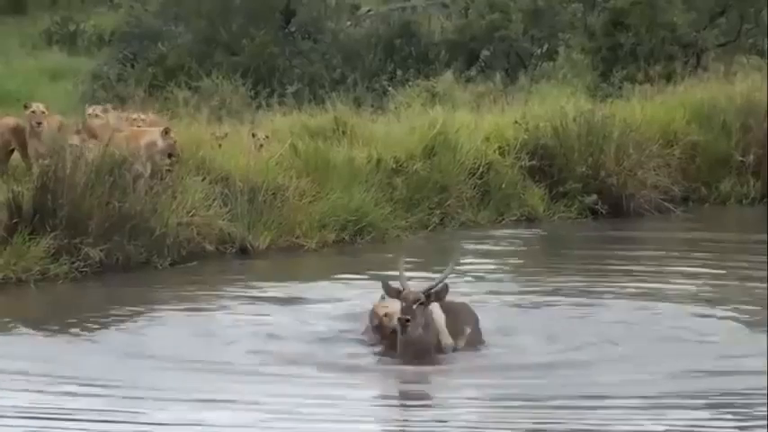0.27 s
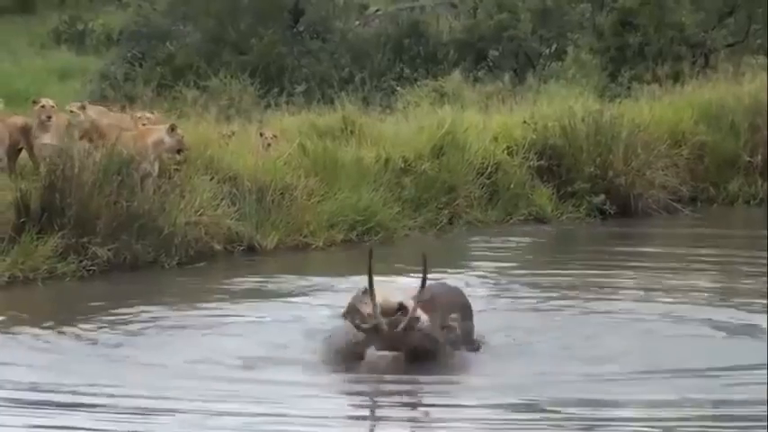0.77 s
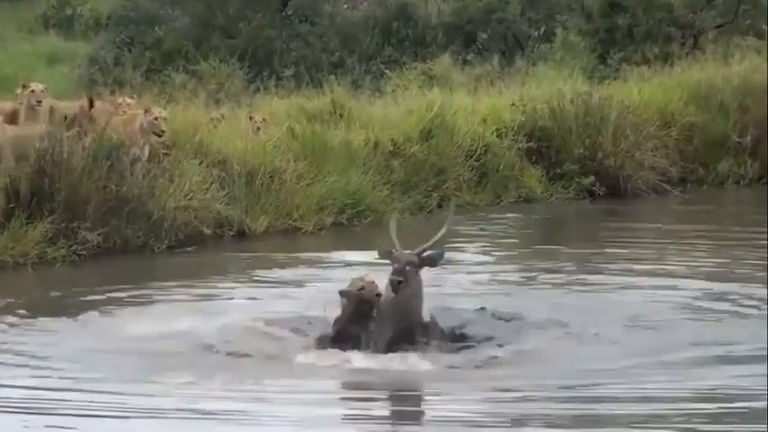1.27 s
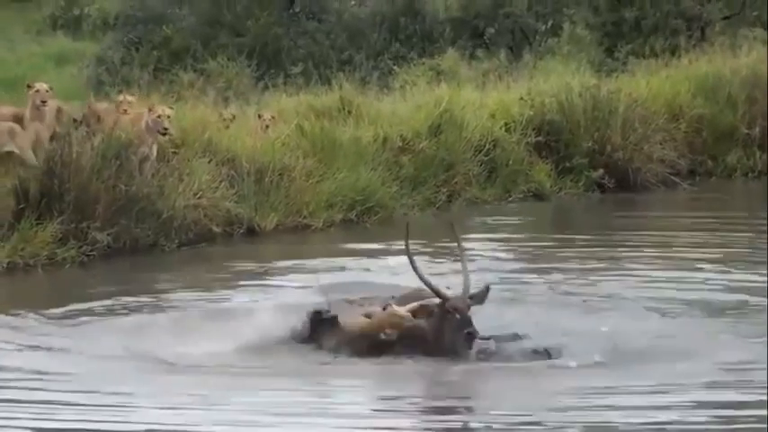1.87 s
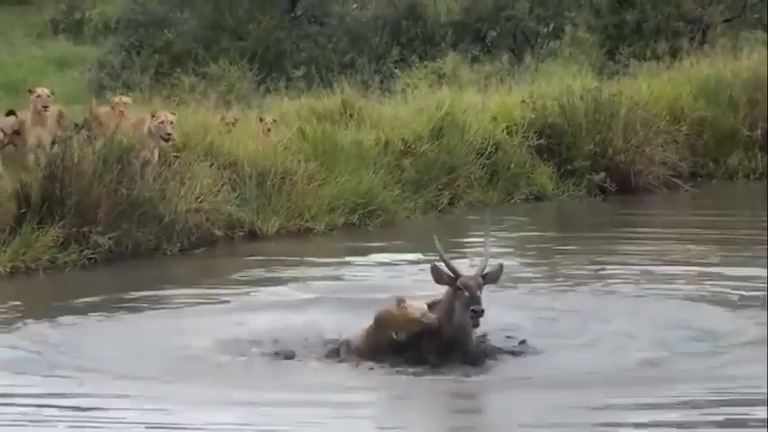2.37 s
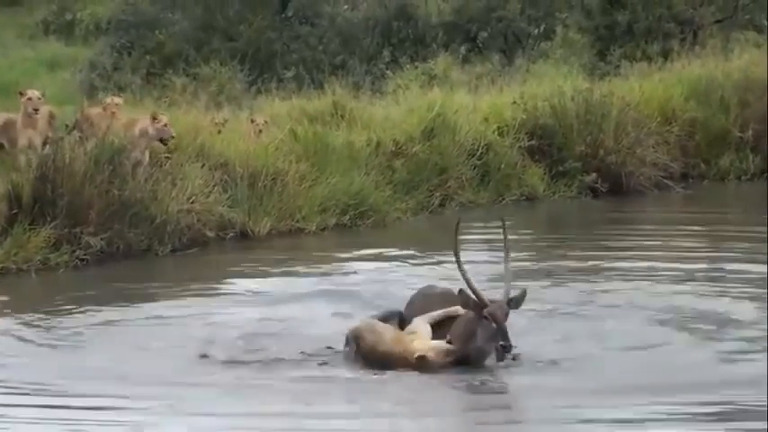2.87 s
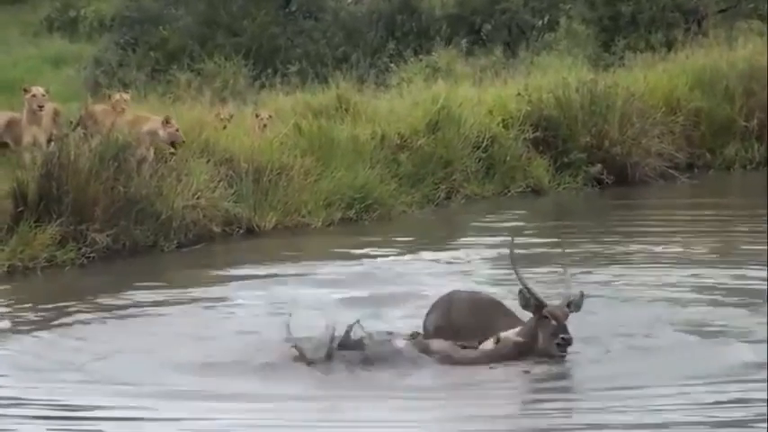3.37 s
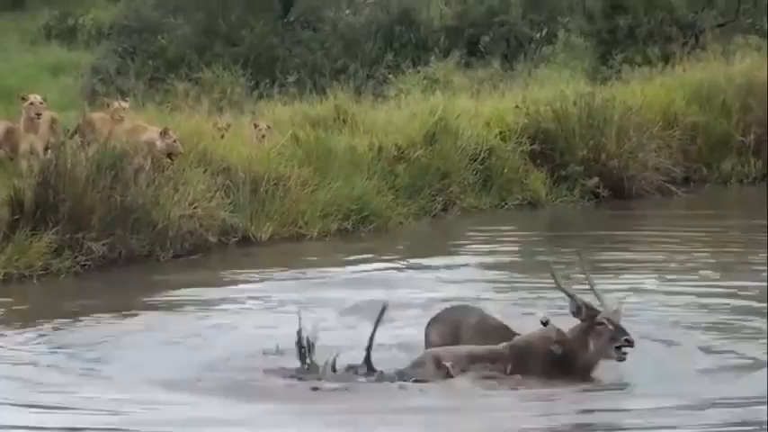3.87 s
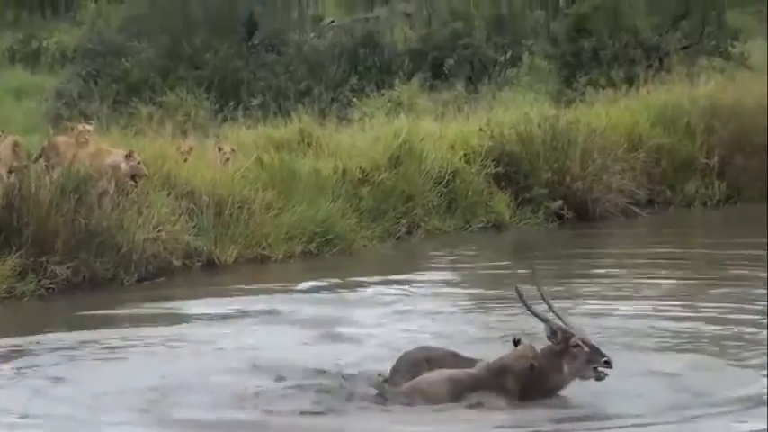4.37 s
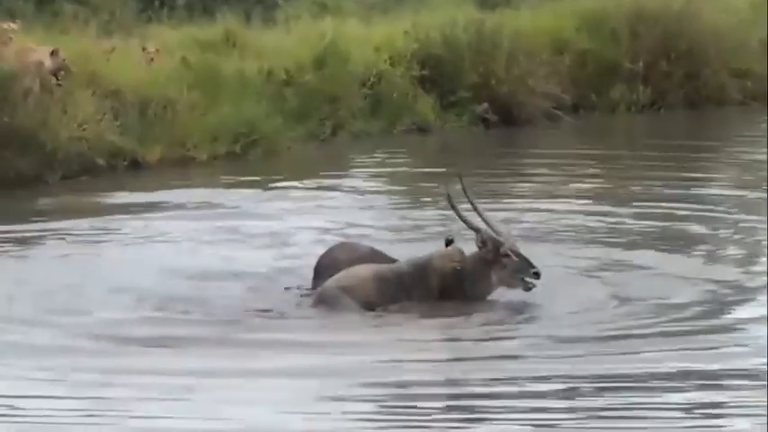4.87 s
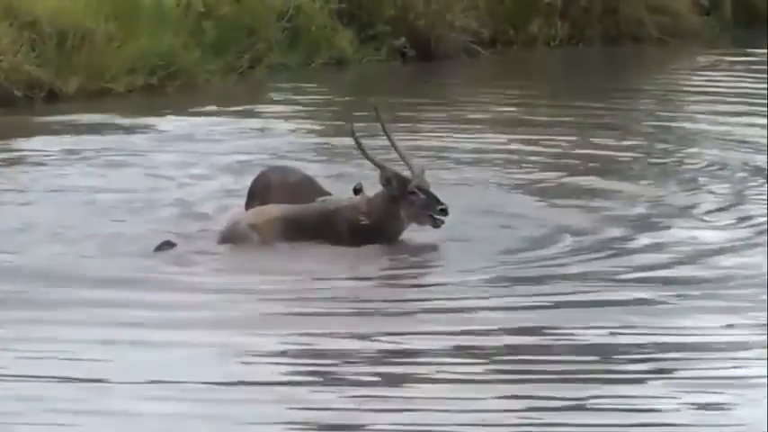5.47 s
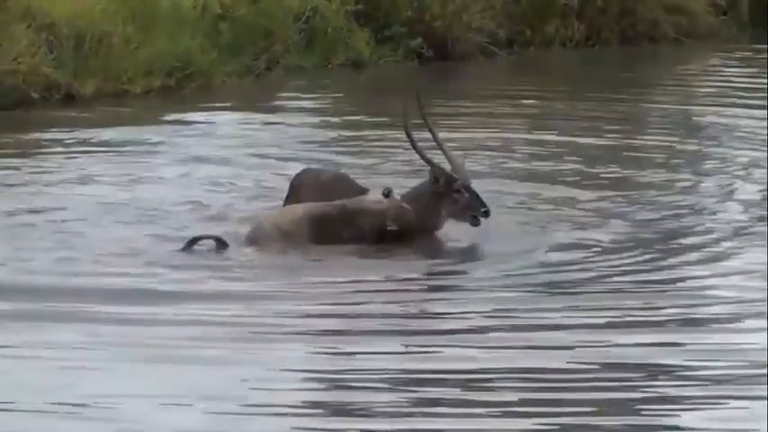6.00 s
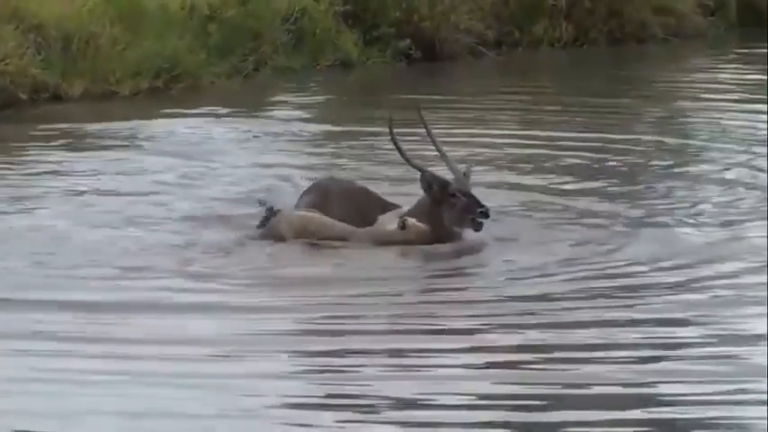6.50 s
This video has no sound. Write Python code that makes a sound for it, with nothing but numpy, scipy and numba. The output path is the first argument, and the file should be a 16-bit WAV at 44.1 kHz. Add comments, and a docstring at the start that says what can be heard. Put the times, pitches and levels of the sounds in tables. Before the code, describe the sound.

Water slaps and wind pops lead into two long rasping growl-roars from a struggle in a river, over faint insects and chirping birds.

```python
"""Insects, still air and a low rumble of wind and chest last throughout, with churning water faint at first.
Bird chips and a short hoarse grunt open; slaps, wind pops and falling bird slides follow up to two seconds.
An animal struggling in a pool then gives two long roars: irregular puffs of air through a long throat.
Churning, drips and chips carry on after them. Water is filtered noise with bubble rings, birds are gliding
sines, the rumble is low noise, and the banks answer the struggle with a short, faint, diffuse echo."""
import sys
import numpy as np
from scipy import signal
from scipy.fft import rfft, irfft, next_fast_len
from scipy.io import wavfile
from scipy.ndimage import uniform_filter1d, map_coordinates
from numba import njit

SR = 44100
rng = np.random.default_rng(int(sys.argv[2]) if len(sys.argv) > 2 else 0)


def wrap_up_sound(samples):
    """Save the sound to the file named by the first command line argument, as 16-bit audio."""
    columns = np.atleast_2d(samples).T
    # keep every value between -1 and 1, then stretch to whole-number steps
    tamed = np.clip(columns, -1, 1)
    steps = np.round(tamed * 32767).astype(np.int16)
    wavfile.write(sys.argv[1], SR, steps)


N = 297234


def amp(db):
    """Decibel law: the amplitude gain of a level in dB."""
    return 10 ** (np.asarray(db) / 20)


def unit(x):
    """Power normalisation: x at rms 1."""
    return x / np.sqrt(np.mean(x ** 2) + 1e-20)


def curves(rows):
    """Linear interpolation: one value per sample for each column after the time."""
    time_s, *columns = np.transpose(rows)
    return [np.interp(np.arange(N) / SR, time_s, column) for column in columns]


def wobble(rate):
    """Random modulation: a smooth curve through normal draws, rate knots a second."""
    knots = rng.standard_normal(int(N * rate / SR) + 4)
    return map_coordinates(knots, [np.arange(N) * rate / SR])


def swell(s, half):
    """Raised-cosine envelope: a bump of height 1 at s, down to half height at s - half and s + half."""
    return np.cos(np.pi / 2 * np.clip((np.arange(N) / SR - s) / half / 2, -1, 1)) ** 2


def filtered(x, response):
    """Linear filtering: the spectrum of x times a complex response of frequency."""
    m = next_fast_len(N + SR // 2)
    return irfft(rfft(x, m) * response(np.fft.rfftfreq(m, 1 / SR)), m)[..., :N]


def coloured(x, points):
    """Spectral shaping: x through (Hz, dB) points joined on a log frequency axis, at rms 1."""
    f, db = np.transpose(points)
    return unit(filtered(x, lambda hz: amp(np.interp(np.log(hz + 1), np.log(f + 1), db))))


def through(x, modes):
    """Modal superposition: fixed (Hz, width Hz, dB) resonances of alternating sign, at rms 1."""
    def response(f):
        total = 0
        for k, (centre, width, db) in enumerate(modes):
            damping = 1j * f * width
            total = total + (-1) ** k * amp(db) * damping / (centre * centre - f * f + damping)
        return total
    return unit(filtered(x, response))


@njit
def spin(x, step):
    """Damped oscillation: a decaying phasor driven by x; step is its turn and decay per sample."""
    out, y = np.zeros(len(x)), 0j
    for i in range(len(x)):
        y = y * step[i] + x[i]
        out[i] = y.imag
    return out


def moving(x, hz, width_hz):
    """Time-varying resonance: x through a resonator whose frequency follows a curve, at rms 1."""
    return unit(spin(x, np.exp((2j * hz - width_hz) * np.pi / SR)))


def patchy(channels, patchy_db):
    """Random modulation: noise with patches of gain in time and frequency, alike in all channels."""
    z = signal.stft(rng.standard_normal((channels, N)), nperseg=512)[2]
    field = uniform_filter1d(rng.standard_normal(z.shape[1:]), 6, axis=0)
    field = uniform_filter1d(field, 8, axis=1)
    return signal.istft(z * amp(patchy_db * unit(field)), nperseg=512)[1][:, :N]


def spread(pair, side_db):
    """Partial coherence: left and right from a middle and an unrelated side."""
    side = amp(side_db) * pair[1]
    return np.array([pair[0] + side, pair[0] - side])


# spectrum of the still air: frequency_hz, relative_density_db (per Hz)
AIR_SPECTRUM = [(180, -40), (300, 0.5), (1330, -3), (3400, -11.5), (4080, -8), (5310, -10.5),
                (13200, -19.5), (14600, -28), (15600, -65)]
AIR_DB, INSECT_DB = -53.5, -57.5  # middle level; the insects pulse about theirs


def meadow():
    """Narrow-band noise under random modulation: a pulsing insect band over the still air."""
    band = through(rng.standard_normal((2, N)), [(4140, 510, 0)])
    band = through(band, [(4070, 530, 0)])
    pulsing = amp(INSECT_DB + 2.2 * wobble(30) + 0.7 * wobble(10))
    insects = pulsing * spread(band, side_db=-0.5)
    air = coloured(patchy(channels=2, patchy_db=3.0), AIR_SPECTRUM)
    return insects + amp(AIR_DB) * spread(air, side_db=-2.5)


# level of the low rumble, wind and the chest of the roars together: time_s, rumble_db
RUMBLE_LEVEL = [(0.0, -48), (0.05, -54), (0.09, -32.5), (0.36, -28.5), (0.39, -20.5), (0.45, -47.5),
                (0.66, -60), (0.67, -40.5), (1.37, -34), (1.67, -46), (1.8, -21.5), (1.84, -34.5),
                (2.19, -27), (3.34, -43.5), (3.47, -30.5), (4.41, -25), (4.43, -34.5), (5.56, -28),
                (5.61, -36), (6.49, -44), (6.65, -25), (6.74, -42)]
# spectrum of the rumble: frequency_hz, relative_density_db (per Hz)
RUMBLE_SPECTRUM = [(12, -40), (20, -4.5), (60, 0.5), (150, -11.5), (275, -25.5), (348, -26), (400, -50),
                   (520, -51), (880, -120)]


def rumble():
    """Partly coherent low noise: wind and chest as one lumpy rumble, stronger on the right."""
    lumps = amp(1.5 * wobble(16) + 1.5 * np.array([wobble(12), wobble(12)]))
    pair = spread(coloured(rng.standard_normal((2, N)), RUMBLE_SPECTRUM), side_db=-1.5)
    return amp(curves(RUMBLE_LEVEL)[0]) * unit(lumps * pair) * amp([[-1.8], [1.8]])


def grains(count, hz, spread, cycles, scatter_db):
    """Bubble resonance: damped rings at random moments, pitch rising as they close, at rms 1."""
    draw, t = rng.random((count, 2)), np.arange(400) / SR
    pitch = hz * np.exp(spread * rng.standard_normal((count, 1)))
    size = amp(-scatter_db * np.log(draw[:, 1:]))
    turns = pitch * t * (1 + .1 * pitch * t / cycles)
    ring = size * np.sin(2 * np.pi * turns) * np.exp(-pitch * t / cycles)
    at = (draw[:, :1] * N).astype(int) + np.arange(len(t))
    return unit(np.bincount(at.ravel(), ring.ravel())[:N])


# effort of the struggle: time_s, slosh_db
CHURN_LEVEL = [(0.07, -65), (0.42, -42), (0.76, -46.5), (0.8, -39), (0.846, -43.5), (0.866, -33.5),
               (1.03, -30.5), (1.23, -34), (1.83, -31), (1.93, -37.5), (2.95, -34), (3.03, -37.5),
               (3.24, -40), (3.4, -49), (4.8, -32), (4.87, -32.5), (4.936, -42.5), (5.1, -39.5), (5.7, -45),
               (5.85, -53), (6.35, -58.5), (6.4, -45.5), (6.55, -48), (6.67, -56.5)]
# spectrum of the slosh: frequency_hz, relative_density_db (per Hz)
SLOSH_SPECTRUM = [(88, -16), (150, -3), (251, -10), (561, 2.5), (689, -7), (818, -4.5), (1460, -9.5),
                  (2530, -11), (9000, -34.5), (11700, -34), (19800, -120)]
# spectrum of the spray: frequency_hz, relative_density_db (per Hz)
SPRAY_SPECTRUM = [(1760, -3.5), (3000, -5), (5890, -12), (6490, -7.5), (8430, -13.5), (11800, -17.5),
                  (15600, -26)]
# thrown water raining back: centre_s, half_length_s (to half height), peak_db (before the flicker)
RAINING_SHEETS = [(0.437, 0.026, -52), (0.926, 0.031, -44), (1.058, .03, -44), (1.475, 0.14, -39.5),
                  (1.83, 0.038, -38), (3.22, 0.12, -52), (4.844, 0.037, -55), (5.12, 0.29, -53.5)]
SPRAY_DB, SPRAY_GROWS = -51.5, 0.56  # level at mean slosh dB; dB gained per dB of slosh


def water():
    """Turbulence and bubble resonance: patchy slosh with bubbles, and spray with crackle."""
    slosh_db, = curves(CHURN_LEVEL)
    falling = amp(SPRAY_DB + SPRAY_GROWS * (slosh_db - slosh_db.mean()))
    falling = falling + sum(amp(db) * swell(s, half) for s, half, db in RAINING_SHEETS)
    lumps = wobble(18)
    slosh = coloured(patchy(channels=1, patchy_db=2.5)[0], SLOSH_SPECTRUM)
    bubbles = grains(count=3000, hz=1100, spread=.6, cycles=4, scatter_db=1.8)
    spray = coloured(patchy(channels=1, patchy_db=2.0)[0], SPRAY_SPECTRUM)
    crackle = grains(count=5000, hz=5760, spread=0.345, cycles=1.8, scatter_db=1.5)
    churning = amp(slosh_db + 0.5 * lumps) * unit(slosh + .8 * bubbles)
    return churning + falling * amp(1.3 * wobble(25)) * unit(spray + 0.45 * crackle)


def whistle(s, length, from_hz, to_hz, db, bend):
    """Frequency modulation: one falling sine under a smooth swell; bend warps its course in time."""
    u = np.clip((np.arange(N) / SR - s) / length, 0, 1) ** bend
    cycles = np.cumsum(from_hz + (to_hz - from_hz) * u) / SR
    return amp(db) * np.sin(np.pi * u) * np.sin(2 * np.pi * cycles)


# three-chip phrases, levels before panning: last_chip_s, last_peak_db, last_middle_hz
CHIP_PHRASES = [(0.0345, -40.5, 3890), (0.0792, -47, 4530), (0.299, -41.5, 4080), (3.4341, -41, 4110),
                (5.407, -40.5, 4040), (6.2447, -39.5, 3980)]
# falling whistles, levels before panning: start_s, length_s, peak_db
FALLING_SLIDES = [(0.078, 0.083, -48), (.545, 0.087, -46.5), (1.245, 0.11, -41), (1.602, .12, -44)]
SLIDE_FROM_HZ, SLIDE_TO_HZ = 5700, 4000
CHIP_GAP_S, CHIP_CLIMB_HZ, CHIP_SWELL_DB = .0225, 70, 2.5  # each phrase climbs and swells


def birds():
    """Tonal glides panned by level: quick falling chips to the left, long slides to the right."""
    chips = slides = 0
    for s, db, hz in CHIP_PHRASES:
        for k in range(3):  # counted back from the last chip
            middle_hz = hz - k * CHIP_CLIMB_HZ
            chips = chips + whistle(s - k * CHIP_GAP_S - .003, 0.0186, middle_hz * 1.07, middle_hz * .93,
                                    db - k * k * CHIP_SWELL_DB, bend=0.89)
    for s, length, db in FALLING_SLIDES:
        slides = slides + whistle(s, length, SLIDE_FROM_HZ, SLIDE_TO_HZ, db, bend=1.8)
    return slides * amp([[-1.5], [1.5]]) + chips * amp([[1.5], [-1.5]])


def banks(x):
    """Diffuse reflection: x convolved with a short decaying noise tail, different on each side."""
    t = np.arange(SR // 4) / SR
    tail = rng.standard_normal((2, len(t))) * amp(-60 * t / 0.024)  # falls 60 dB in 24 ms
    delayed = np.pad(x, (200, 0))  # samples
    return signal.fftconvolve(delayed[None], tail / np.linalg.norm(tail[0]), axes=1)[:, :N]


def bursts(tables):
    """Gated envelopes: curves of several calls, down to -100 dB in between."""
    rows = []
    for call in tables:
        first, last = call[0], call[-1]
        rows += [[first[0] - .004, -100, *first[2:]], *call, [last[0] + .03, -100, *last[2:]]]
    return curves(rows)


# one list per call: time_s, effort_db, mouth_opening_db, lowest_resonance_hz, second_resonance_hz
ROAR_CALLS = [
    [(0.088, -29.5, 1, 198, 645), (0.165, -32, 1.5, 205, 617), (0.2, -35.5, 4, 225, 620),
     (0.25, -39.5, 7.5, 251, 630), (0.314, -43, 9, 250, 665), (0.4, -46, 4.5, 219, 670)],
    [(1.95, -35, 1, 197, 620), (1.99, -23.5, -2.5, 210, 665), (2.07, -22.5, 0.5, 270, 747),
     (2.2, -21, 1.5, 308, 733), (2.3, -21, -1.5, 288, 690), (2.46, -25.5, 0, 293, 825),
     (2.54, -23, -8.5, 307, 792), (2.62, -26, -7, 312, 680), (2.72, -22.5, -6, 304, 656),
     (2.82, -24.5, 3, 324, 653), (2.88, -30.5, 6.5, 340, 640), (2.92, -45, 11.5, 364, 635)],
    [(3.44, -33.5, -6, 413, 820), (3.52, -25, -8.5, 325, 850), (3.66, -19.5, -0.5, 343, 915),
     (3.78, -20, 0.5, 420, 910), (3.87, -22.5, -0.5, 392, 905), (3.94, -24.5, 2, 343, 755),
     (4.09, -23, 2.5, 362, 796), (4.18, -19.5, 2, 388, 895), (4.24, -22, 0.5, 345, 878),
     (4.31, -20.5, -6, 333, 828), (4.54, -23, -1, 322, 781), (4.65, -25.5, -8, 337, 825),
     (4.75, -37.5, 9.5, 313, 850)],
]
# one row per call: resonance_spacing_hz, then against the lowest resonance, mouth half open:
# second_db, third_db, upper_throat_db, rasp_db
THROAT_SHAPES = [(417, -1.6, -6.5, -9, -22.5), (456, -3.4, -7, -15.5, -16.5),
                 (475, -0.86, -10.5, -13.5, -19.5)]
# lips draw back, the rasp swells: centre_s, half_length_s (before rounding), gain_db, mouth_hz,
# wide_mouth_ring_db (against the narrow one)
LIP_SNARLS = [(0.265, 0.085, 13, 2600, -3), (2.107, 0.04, 2, 3030, -1.5), (2.295, 0.043, 6, 2880, -3),
              (2.43, 0.045, 2, 2500, -4), (2.62, 0.056, 11.5, 2780, 1), (2.8, 0.053, 16.5, 2670, 2.5),
              (3.715, 0.091, 2, 2790, -4.5), (3.896, .05, 1, 2500, 2), (4.046, 0.044, 4.5, 2500, 3),
              (4.175, 0.039, 6, 2510, -10), (4.417, .06, 7.5, 2750, -2.5), (4.554, 0.069, 8.5, 2930, 0)]
# wide resonances of the mouth: frequency_hz, width_hz, level_db
MOUTH_RING = [(2290, 750, -0.5), (3346, 440, 3.5), (3740, 510, 2)]
PUFFS_PER_S = 66  # median of a wandering rate
THIRD_GROWS, UPPER_GROWS, RASP_GROWS = 1.05, 1.4, 0.9  # dB gained per dB of mouth opening
SNARL_ROUND = 0.44  # exponent; under 1: quick edges, flat top


def roars():
    """Source and filter: uneven puffs gate turbulent air; throat and mouth resonances colour it."""
    effort_db, opening, first, second = bursts(ROAR_CALLS)
    shapes = []
    for call, throat in zip(ROAR_CALLS, THROAT_SHAPES):
        shapes += [(call[0][0], *throat), (call[-1][0], *throat)]
    spacing, second_db, third_db, upper_db, rasp_db = curves(shapes)
    third_db = third_db + THIRD_GROWS * opening
    upper_db = upper_db + UPPER_GROWS * opening
    snarl_db = sum(gain_db * swell(s, half) ** SNARL_ROUND for s, half, gain_db, *_ in LIP_SNARLS)
    rasp_db = rasp_db + RASP_GROWS * opening + snarl_db
    mouth_hz, wide_db = curves([(s, *shape) for s, half, gain_db, *shape in LIP_SNARLS])
    third = first + 2 * spacing
    first, second, third = [hz * (1 + .01 * wobble(25)) for hz in (first, second, third)]  # walls tremble

    puff_count = np.floor(np.cumsum(PUFFS_PER_S * np.exp(.5 * wobble(50))) / SR)
    starts = np.diff(puff_count, prepend=0) * amp(1.6 * rng.standard_normal(N))
    t = np.arange(900) / SR
    puffs = unit(signal.fftconvolve(starts, t * t * np.exp(-t / 0.0016))[:N])
    flutter = amp(1.7 * wobble(11))  # loose folds make the effort waver

    def air(steady):
        """Turbulent noise on a steady flow plus the puffs."""
        return unit((steady + puffs) * flutter * rng.standard_normal(N))

    source = air(2.35) + 0.23 * unit(starts * flutter)

    def sharp(hz, width_hz):
        """Cascaded resonance: a wide second stage keeps the valleys dark."""
        return moving(moving(source, hz, width_hz), hz, 530)

    low = sharp(first, 60) - amp(second_db) * sharp(second, 45) + amp(third_db) * sharp(third, 75)
    # side pockets of the throat
    pockets = through(air(0.96), [(195, 270, -8.0), (549, 153, 0.5), (1090, 320, -7)])
    pockets = amp(-4.0) * through(pockets, [(680, 1700, 0)])
    gap = (third - first) / 2  # a long tube rings at even spacing
    upper = sharp(third + gap, 70)
    upper = upper - amp(-2) * sharp(third + 2 * gap, 80)
    upper = unit(upper + amp(-5) * sharp(third + 3 * gap, 100))
    wide_ring = through(through(air(1.03), MOUTH_RING), [(3260, 2400, 0)])
    rasp = unit(sharp(mouth_hz, 180) + amp(wide_db) * wide_ring)
    return amp(effort_db) * (low + pockets + amp(upper_db) * upper + amp(rasp_db) * rasp)


# whistling gaps between the teeth: gap_hz, width_hz, leak_db (against the effort)
TOOTH_GAPS = [(4900, 740, -30.5), (6900, 1840, -29.5), (10400, 2800, -30.5)]
# breath forced through one gap: centre_s, half_length_s (to half height), gap_hz, peak_db (before flicker)
HISS_PUFFS = [(0.28, 0.11, 6900, -57), (0.28, .1, 10400, -61), (2.666, .02, 6900, -43),
              (2.02, 0.16, 6900, -47.5), (2.276, 0.16, 10400, -45), (2.346, 0.034, 6900, -43.5),
              (2.493, 0.063, 4900, -41.5), (2.466, 0.13, 6900, -51), (2.83, 0.093, 4900, -49),
              (2.812, 0.09, 6900, -36.5), (2.823, 0.1, 10400, -46.5), (3.69, .07, 6900, -52),
              (3.76, 0.027, 10400, -62), (4.06, .08, 4900, -53), (4.12, .14, 10400, -49),
              (4.194, 0.08, 6900, -43.5), (4.47, 0.058, 4900, -54.5), (4.725, 0.064, 6900, -43),
              (4.68, 0.074, 10400, -47.5)]


def hiss():
    """Turbulent jet noise past the teeth: a steady leak with the effort, and puffs through single gaps."""
    effort, out = amp(bursts(ROAR_CALLS)[0]), 0
    for hz, width, leak_db in TOOTH_GAPS:
        jet = through(patchy(channels=1, patchy_db=3.0)[0], [(hz, width, 0)])
        jet = through(jet, [(hz, 2 * width, 0)])
        puffs = sum(amp(db) * swell(s, half) for s, half, gap_hz, db in HISS_PUFFS if gap_hz == hz)
        out = out + jet * (amp(leak_db) * effort + puffs)
    return out * amp(1.66 * wobble(45))


# single gusts popping the microphone ports, levels before panning: start_s, level_db, pitch_hz
GUST_POPS = [(0.386, -18, 75.5), (1.281, -29, 70), (1.782, -18, 81), (1.795, -24, 70), (1.807, -17.5, 88.5),
             (1.918, -18.5, 70)]


def thumps():
    """Pressure pulses: each pop is a cycle and a half of low tone, stronger on the right."""
    pops = 0
    for s, db, hz in GUST_POPS:
        cycles = np.clip((np.arange(N) / SR - s) * hz, 0, 1.5)
        pops = pops + amp(db) * np.sin(2 * np.pi * cycles) * np.sin(np.pi * cycles / 1.5)
    return pops * amp([[-1.5], [1.5]])


# slaps and drips: start_s, level_db (of the puff, before its envelope), starting_pocket_hz,
# crack_db (against level)
WATER_SLAPS = [(.42, -48, 1000, 10), (.439, -38, 1030, -4), (.455, -31.5, 2280, -5),
               (0.475, -33.5, 886, -20), (0.618, -31, 920, -20), (.652, -36, 1600, -24),
               (.672, -37, 930, -25), (0.852, -22.5, 1060, -28), (0.863, -24.5, 1030, -26),
               (.914, -35.5, 885, 9), (0.928, -41, 1090, 12), (.94, -41, 796, 7),
               (1.035, -26.5, 1000, -2.5), (1.51, -27.5, 1240, -6), (1.565, -25, 770, -16),
               (1.82, -31, 1840, -6), (3.058, -39.5, 2480, -14), (4.909, -40, 2520, 4),
               (5.578, -41, 2180, -3), (5.637, -42, 2400, -13), (5.712, -47, 990, 5)]
SLAP_T60_S = 0.025


def slaps():
    """Cavity resonance on impact: an air pocket rings once inside a dying puff, with a short bright crack."""
    out, t = np.zeros(N + SR), np.arange(SR // 8) / SR
    bright = signal.butter(3, [2500, 7500], "band", fs=SR)
    smack = 1 + 1.2 * np.exp(-t / 0.00067)  # the first contact is hardest
    onset = 1 - np.exp(-t / 0.00039)
    for s, db, hz, crack_db in WATER_SLAPS:
        noise = rng.standard_normal((2, len(t)))
        around = signal.butter(2, [hz * .6, hz * 2.4], "band", fs=SR)
        puff = unit(signal.lfilter(*around, noise[0]))
        pocket = 2.25 * np.sin(2 * np.pi * hz * t * (1 + 8 * t))  # pitch rises
        crack = amp(crack_db) * unit(signal.lfilter(*bright, noise[1]))
        envelope = amp(db - 60 * t / SLAP_T60_S) * onset
        out[round(s * SR):][:len(t)] += envelope * (pocket + smack * puff + crack)
    return out[:N]


def scene():
    """Superposition: the struggle in the middle, its echo, and the place around it."""
    fight = roars() + hiss() + water() + slaps()
    return fight + amp(-14) * banks(fight) + birds() + meadow() + rumble() + thumps()


# tone of the left-right difference: frequency_hz, gain_db
SIDE_COLOUR = [(60, -1), (140, 4.5), (300, -2), (3000, -0.5), (6500, -16), (10500, 3), (13000, -7)]
TOP_HZ = 15700  # band limit


def record(dry):
    """Middle-side filtering: the left-right difference has its own tone; nothing passes the band limit."""
    f, db = np.transpose(SIDE_COLOUR)
    middle, side = (dry[0] + dry[1]) / 2, (dry[0] - dry[1]) / 2
    side = filtered(side, lambda hz: amp(np.interp(np.log(hz + 1), np.log(f), db)))
    return filtered(middle + np.array([side, -side]), lambda hz: hz < TOP_HZ)


dry = scene()
out = record(dry)
wrap_up_sound(out)
```